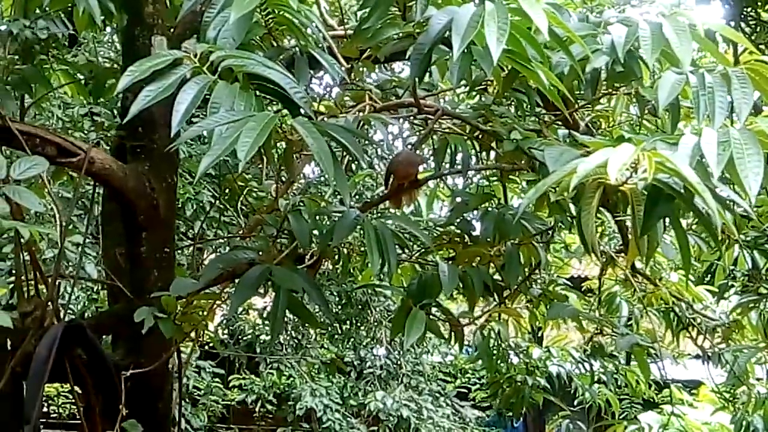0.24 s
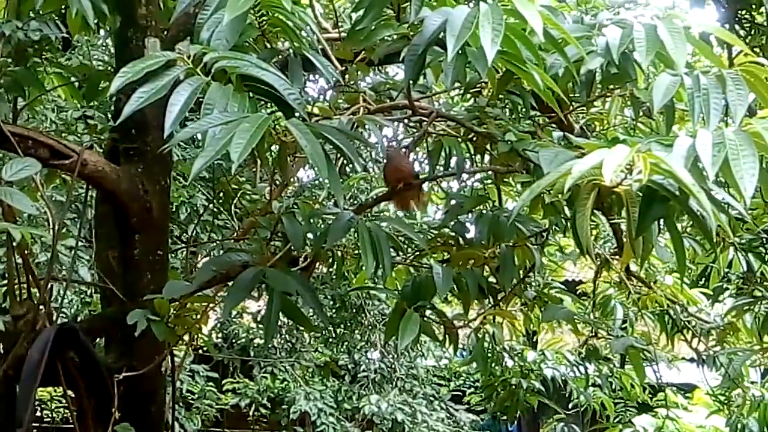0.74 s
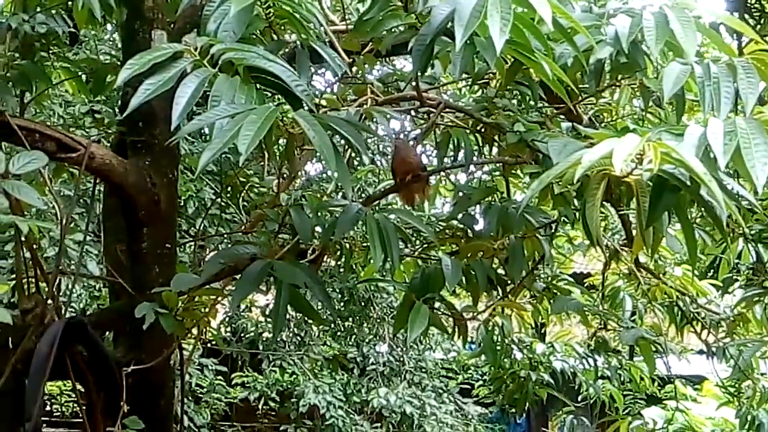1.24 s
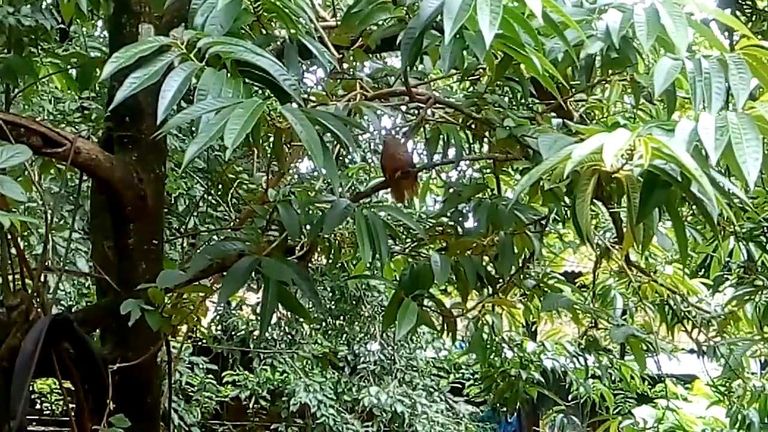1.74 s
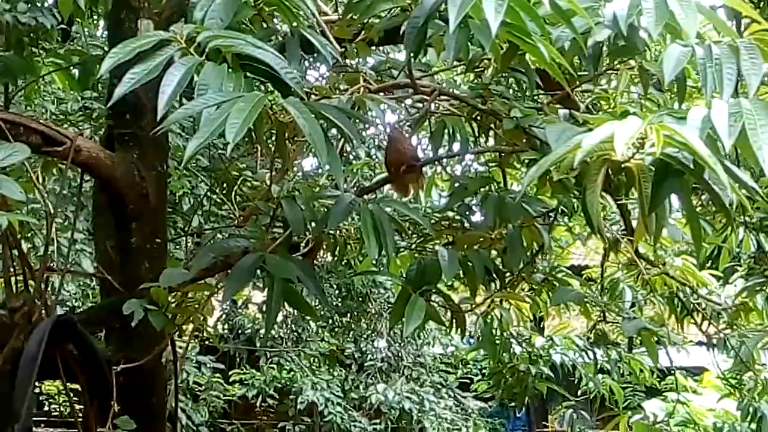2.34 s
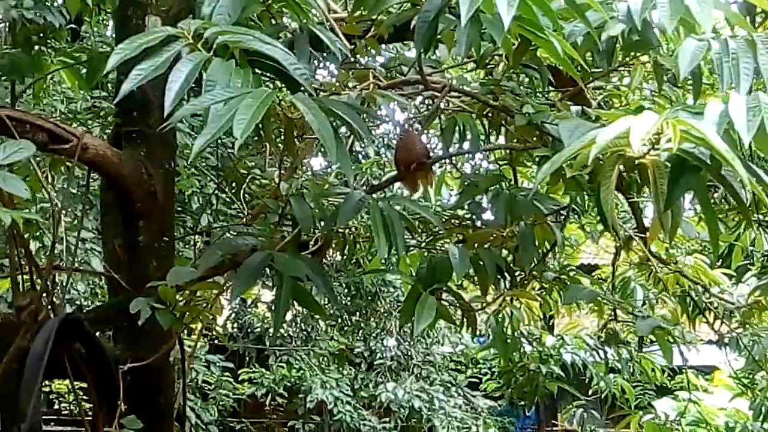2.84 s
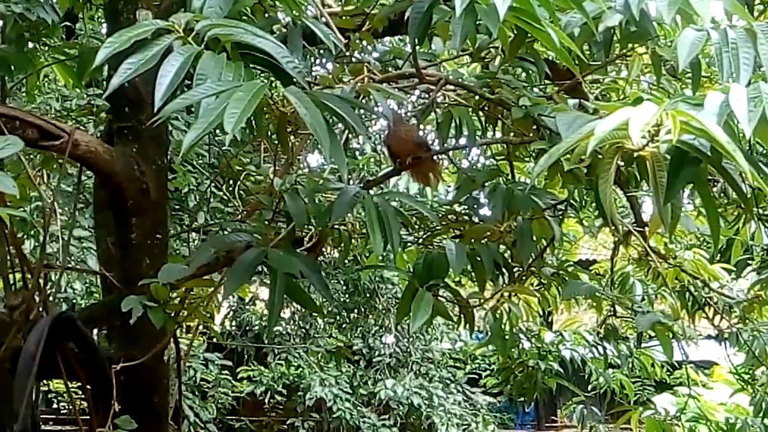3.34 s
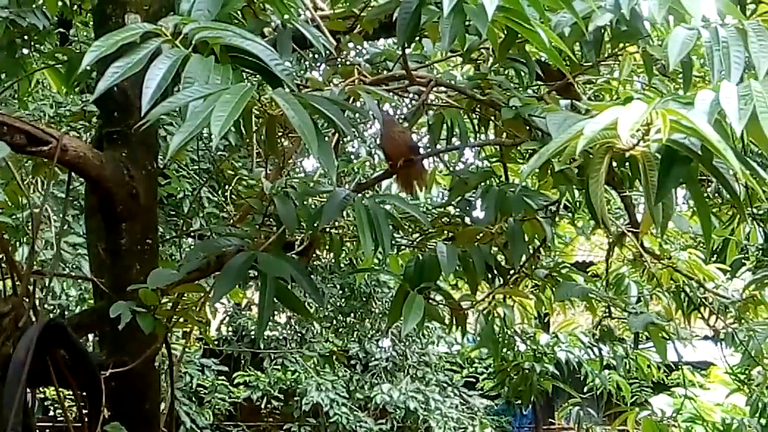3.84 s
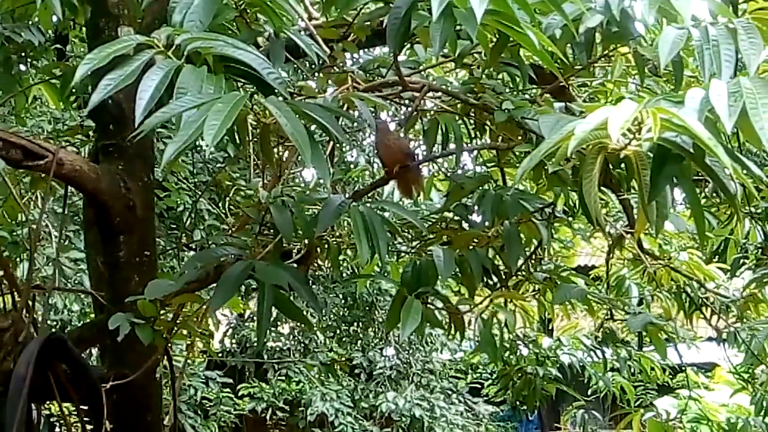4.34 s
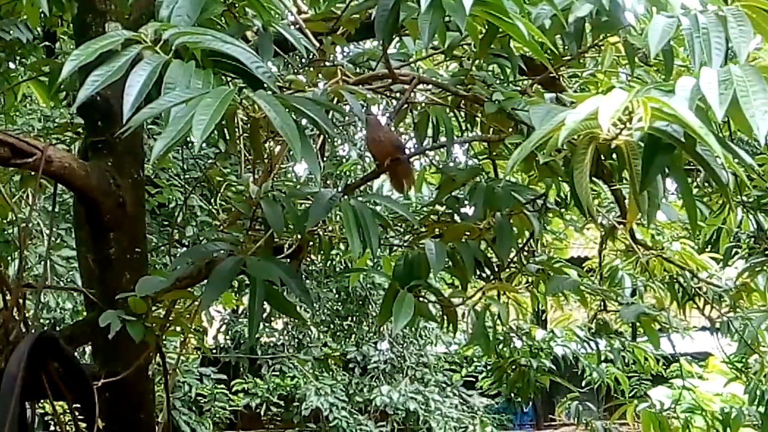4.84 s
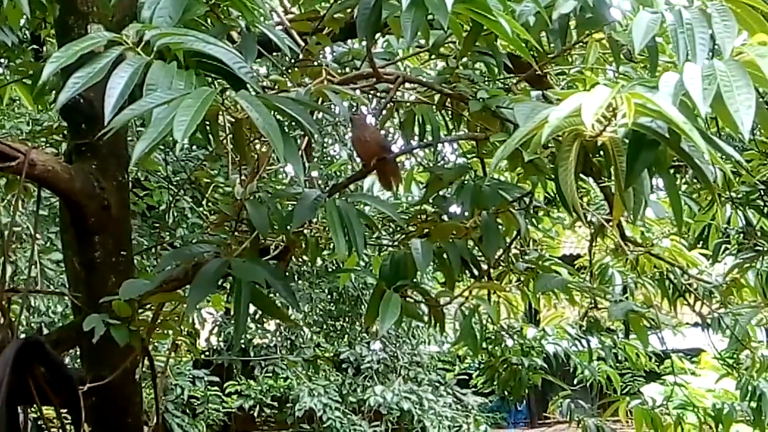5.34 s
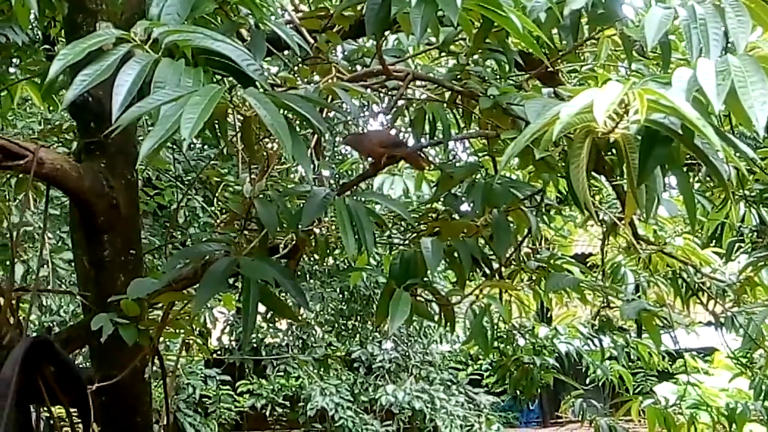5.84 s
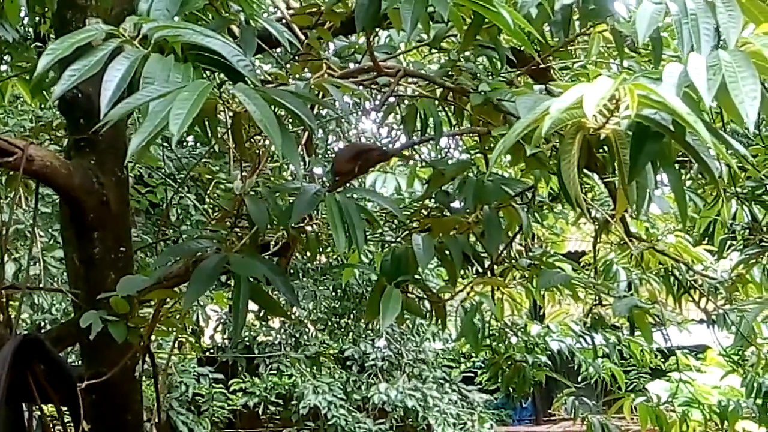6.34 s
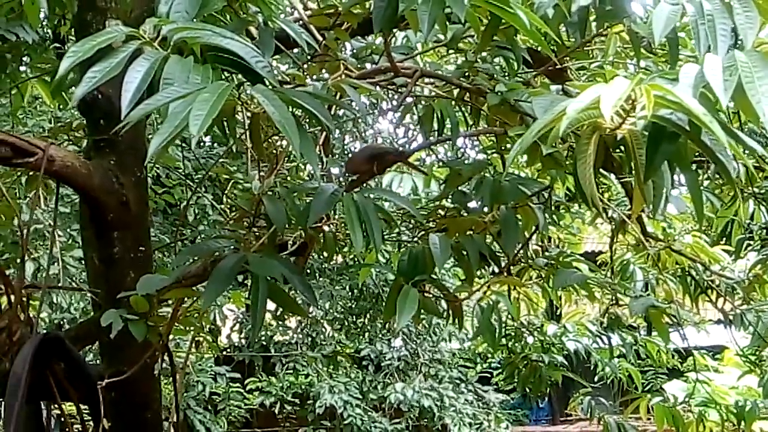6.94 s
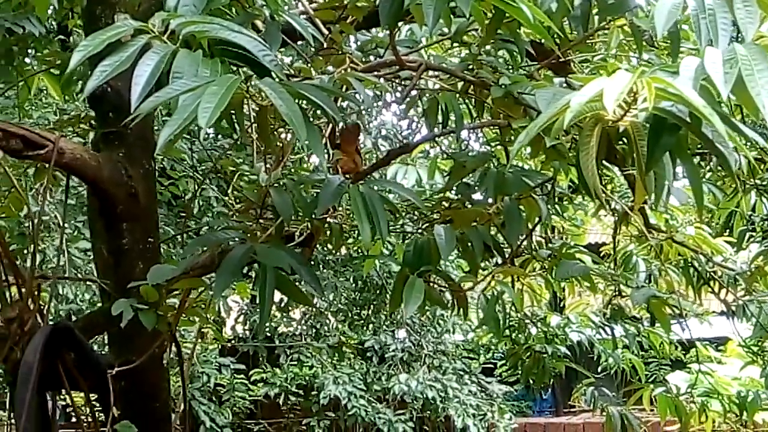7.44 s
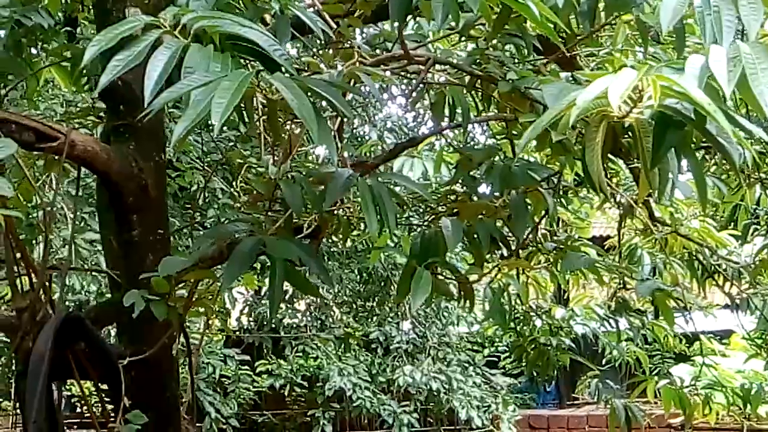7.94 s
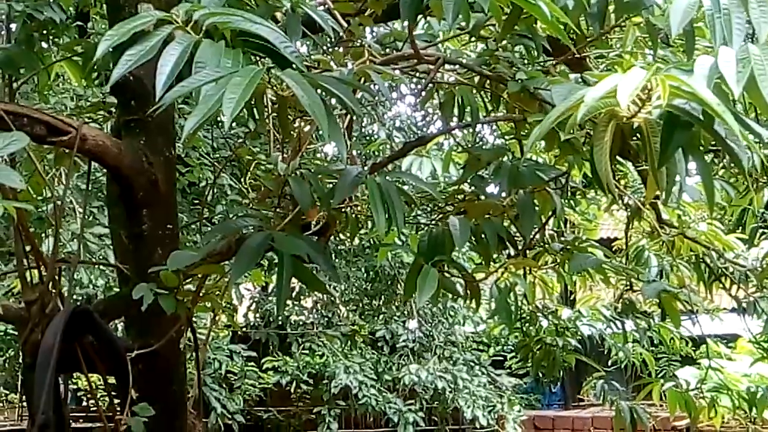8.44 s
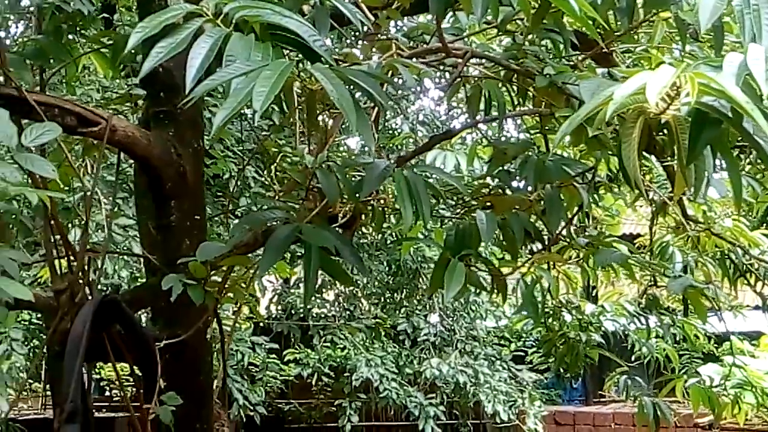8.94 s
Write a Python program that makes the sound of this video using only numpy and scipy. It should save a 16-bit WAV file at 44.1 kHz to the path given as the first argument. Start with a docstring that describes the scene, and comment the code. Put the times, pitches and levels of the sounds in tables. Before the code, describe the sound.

A babbler in a leafy garden tree gives quick, nasal chattering notes, each dropping into a rasp, mixed with short softer chucks. After about four seconds it falls silent; a thin wheezing hiss, faint whistles and distant crowing show through. A cicada begins clicking bursts on the left, and the bird resumes loudly. Stereo outdoor pickup with leafy echoes and steady insect hiss stronger on the left.

```python
"""A babbler chatters in a garden tree: each note is a clear arch of harmonics that drops into a rasp.
A cicada on the left starts up in short bursts of clicks, each setting its body ringing.
A small bird wheezes: a whistle shaken so fast that it hisses. Far birds and horns are unsteady tones.
Insects, leaves and garden air are shaped noise; leaves and walls send most of the calls back as echoes."""
import sys
import numpy as np
from scipy import signal
from scipy.fft import rfft, irfft, next_fast_len
from scipy.io import wavfile
from scipy.ndimage import uniform_filter1d

SR = 44100
rng = np.random.default_rng(int(sys.argv[2]) if len(sys.argv) > 2 else 0)


def generate_wav(sig):
    """Save sig (samples, or channels by samples) to the path in sys.argv[1] as 16-bit PCM at SR."""
    pcm = np.round(np.clip(np.atleast_2d(sig).T, -1, 1) * 32767).astype(np.int16)
    wavfile.write(sys.argv[1], SR, pcm)


N = 404838  # length of the scene in samples
CUTOFF_HZ = 15300  # nothing much is heard above this
# Levels in the tables are those before mixing.


def amp(db):
    """Turn decibels into a gain."""
    return 10 ** (np.asarray(db) / 20)


def rms_one(x):
    """Scale a sound to an average (rms) strength of 1."""
    return x / np.sqrt(np.mean(x ** 2) + 1e-20)


def at_hz(points, hz):
    """Read a curve between its points, on a log-frequency axis."""
    f, value = np.array(points)[:, 0], np.array(points)[:, 1]
    return np.interp(np.log(hz + 1), np.log(f), value)


def coloured(x, points):
    """Make some frequencies stronger or weaker, following a (f/Hz, gain/dB) curve."""
    size = next_fast_len(N)
    gain = amp(at_hz(points, np.fft.rfftfreq(size, 1 / SR)))
    return irfft(rfft(x, size) * gain, size)[..., :N]


def lowpass_or_band(x, hz, kind):
    """Keep the part of a sound below one frequency, or between two."""
    return signal.sosfilt(signal.butter(2, hz, kind, fs=SR, output="sos"), x)


def flutter(rate_hz):
    """Random wobble up to about rate_hz, with a spread of 1."""
    return rms_one(lowpass_or_band(rng.standard_normal(N), rate_hz, "low"))


def turns_of(hz):
    """Add up a changing pitch into the angle of a vibration, in radians."""
    return 2 * np.pi * np.cumsum(hz) / SR


def played(calls, fade_s):
    """Join calls that follow one another into curves in time, plus a gate open while a call lasts."""
    t = np.arange(N) / SR
    s, *columns = np.vstack(calls).T
    edges = np.ravel([(c[0][0] - .002, c[0][0], c[-1][0], c[-1][0] + fade_s) for c in calls])
    gate = np.interp(t, np.maximum.accumulate(edges), np.tile([0, 1, 1, 0], len(calls)))
    return [np.interp(t, s, c) for c in columns] + [gate]


def arch(first, middle, last, share):
    """Draw the parabola through three values at the start, middle and end."""
    return np.polyval(np.polyfit([0, .5, 1], [first, middle, last], 2), share)


def ring(x, hz, t60):
    """Let each click set a sine ringing; a unit click gives height 1, and t60 seconds lose 60 dB."""
    r, w = amp(-60 / (t60 * SR)), 2 * np.pi * hz / SR
    return signal.lfilter([0, np.sin(w)], [1, -2 * r * np.cos(w), r * r], x)


# Babbler notes, one row each: start t/s, arch length t/s, drop length t/s,
# onset f/Hz, mid-arch f/Hz, knee f/Hz, onset level/dB, mid-arch level/dB, rasp level/dB,
# roughness at onset (0-1), roughness at knee (0-1), fundamental level/dB, upper harmonics level/dB.
# The knee is where the arch breaks into the drop; harmonic levels are relative to the second harmonic.
BABBLER_NOTES = [ (0.0, 0.085, .025, 2000, 2053, 2015, -33.5, -40.5, -45, 0.15, 0.69, 6, 1),
                 (.185, 0.0078, 0.036, 1765, 1792, 1746, -45, -39.5, -47, 0.09, 0.06, 0, -12),
                 (.34, 0.0091, 0.042, 1540, 1548, 1560, -42, -48.5, -49, 0, 0.12, 1, -19),
                 (.494, .14, .028, 1882, 2090, 1958, -41.5, -34.5, -39.5, 0.09, 0.73, 1.5, 1),
                 (.737, 0.11, .028, 1915, 2086, 1919, -40, -34, -37, 0.17, 0.87, -1, 1.5),
                 (.951, 0.1, .03, 1900, 2010, 1898, -41.5, -32.5, -37, 0.14, .85, -1, 2),
                 (1.165, .095, .04, 1794, 1962, 1719, -37.5, -32, -34, 0.22, 0.34, -7, 0.5),
                 (1.392, 0.0094, .038, 1440, 1427, 1432, -47, -40, -40.5, 0.37, .45, 0.5, -10),
                 (1.567, 0.017, .03, 1424, 1399, 1370, -49, -42, -47, .1, 0.23, 4.5, -16),
                 (1.675, 0.0094, 0.032, 1618, 1590, 1571, -35, -48, -49.5, 0.42, 0.48, 4, -24),
                 (1.778, 0.0091, 0.056, 1808, 1820, 1800, -42, -40.5, -39, 0.22, 0.27, -3, -13),
                 (1.938, 0.028, 0.068, 1770, 1754, 1712, -44, -40.5, -33.5, 0.1, 0.21, -5, -5.5),
                 (2.142, 0.099, .045, 1774, 1778, 1736, -41.5, -34, -32.5, .7, 0.19, -7, -1),
                 (2.382, .01, 0.042, 1481, 1465, 1452, -45, -33.5, -38.5, 0.48, 0.47, 1, -1.5),
                 (2.543, 0.096, 0.044, 1777, 1677, 1582, -42.5, -32.5, -32, 0.65, 0.12, -10, 0),
                 (2.764, 0.015, .045, 1533, 1533, 1508, -54, -39.5, -33, .5, 0.47, 1, 2),
                 (2.95, 0.0094, 0.028, 1286, 1244, 1216, -44, -42, -43.5, 0.44, 0.48, 7, -4),
                 (3.134, 0.13, 0.052, 1748, 1845, 1605, -36.5, -29, -32, 0.21, 0.08, -6.5, 4),
                 (3.38, 0.096, 0.028, 1690, 1626, 1350, -38.5, -32.5, -30.5, 0.69, 0.17, -2.5, 1.5),
                 (3.588, 0.078, 0.036, 1581, 1466, 1274, -39.5, -33.5, -33, 0.68, 0.28, -3, -1),
                 (3.788, .102, .035, 1641, 1519, 1341, -41, -29.5, -33.5, 0.74, 0.11, -2.5, 2),
                 (4.0, 0.019, 0.041, 1513, 1441, 1382, -45, -35.5, -35.5, 0.53, 0.48, 3, 1),
                 (4.166, 0.016, 0.032, 1464, 1412, 1283, -32, -39.5, -40, 0.39, 0.56, 2.5, -.5),
                 (7.739, 0.16, 0.03, 1931, 2018, 1956, -45.5, -40.5, -48, 0.21, 0.67, 8.5, 5.5),
                 (7.998, 0.079, .035, 2096, 1995, 1902, -48.5, -39, -37, 0.25, 0.21, 3.5, 3),
                 (8.185, 0.1, 0.037, 1985, 2129, 1956, -41, -37, -35.5, .15, 0.12, 9, 6.5),
                 (8.396, 0.1, 0.038, 1967, 2166, 1965, -37.5, -30.5, -34.5, 0.18, 0.18, 0, 1),
                 (8.603, 0.12, 0.038, 1893, 2089, 1915, -35.5, -35, -31.5, 0.19, 0.17, 3, 6),
                 (8.832, 0.075, 0.054, 1768, 1922, 1676, -38.5, -32, -32.5, 0.21, .1, -2, 5),
                 (9.035, .085, 0.035, 1730, 1661, 1469, -43, -32, -29, 0.64, 0.12, -2.5, 3)]
# Colour that throat and beak give the voice: f/Hz, gain/dB
THROAT_COLOUR = [(240, -64), (400, -53), (518, -25.5), (791, -15), (1060, -28), (2220, -10), (3100, -13),
                 (4390, -1), (5030, -10), (6220, -9), (7580, -30), (9370, -27.5), (10600, -57.5),
                 (11800, -37), (15000, -52.5)]


def babbler():
    """Pulses from the voice organ (syrinx); roughness jitters them and lets air rasp through."""
    notes = [babbler_note(*row) for row in BABBLER_NOTES]
    pitch_hz, level_db, rough, low_db, high_db, gate = played(notes, fade_s=0.008)
    rough = np.clip(rough, 0, 1)
    pitch_hz = uniform_filter1d(pitch_hz, size=600)  # muscles bend the pitch smoothly
    waver = (0.00299 + 0.0299 * rough) * flutter(55.65)
    jitter = .14 * rough ** 2 * flutter(404.4)
    turns = turns_of(pitch_hz * (1 + waver + jitter))
    # Staggered phases soften the pulse.
    harmonics = [np.cos(k * (turns + k / 2)) * (k * pitch_hz < CUTOFF_HZ) for k in range(1, 13)]
    pulses = amp(low_db) * harmonics[0] + harmonics[1] + amp(high_db) * sum(harmonics[2:])
    # Strong and weak cycles taking turns add tones halfway between the harmonics.
    halves = sum(np.cos((k - .5) * turns) for k in range(2, 6))
    pulses += 1.89 * np.maximum(rough - .12, 0) * halves
    pulses *= 1 + 0.92 * rough * flutter(320)  # uneven cycles smear each harmonic but keep its glide
    rasp = 1.48 * rough * rng.standard_normal(N) * (1 + 0.28 * np.cos(turns))
    voice = coloured(np.sqrt(1 - 1.08 * rough) * pulses + rasp, THROAT_COLOUR)
    # Even out the strength first, so that the level curve alone sets the loudness.
    evened = voice / np.sqrt(uniform_filter1d(voice ** 2, size=400) + 1e-12)
    return evened * amp(level_db - 1.0 + 1.7 * flutter(167)) * gate


ATTACK_S, ATTACK_DB = 0.0066, -9  # each note opens from this far below its onset level
KNEE_DIP_DB = -0.5  # the voice thins where the arch breaks
HALF_DROP, HALF_ROUGH = .42, 0.4447  # midway through the drop: share of the pitch lost, least roughness
RASP_HZ, RASP_ROUGH, RASP_FADE_DB = 749, .82, -5  # foot of the drop
SETTLES_AT, FRAYS_AT = 0.44, .7  # shares of the arch: roughness has settled, roughness moves to the knee's
CLEAR_ROUGH = 0.0791  # roughness of longer arches between those two points
TAIL_S, TAIL_HZ, TAIL_FADE_DB = .035, 650, -19  # the dying tail
SHORT_S = .05  # arches up to this length keep the mean of onset and knee roughness there


def babbler_note(start, arch_s, drop_s, onset_hz, mid_hz, knee_hz, onset_db, mid_db, rasp_db,
                 hoarse, frayed, low_db, high_db):
    """One note as rows of t/s, f/Hz, level/dB, roughness, fundamental/dB, upper/dB: arch, drop, tail."""
    share = np.linspace(0, 1, num=11)
    knee = start + arch_s
    s = start + arch_s * share
    hz = arch(onset_hz, mid_hz, knee_hz, share)
    level_db = arch(onset_db, mid_db, (mid_db + rasp_db) / 2 + KNEE_DIP_DB, share)
    level_db += ATTACK_DB * np.maximum(1 - (s - start) / ATTACK_S, 0)
    middle_rough = CLEAR_ROUGH if arch_s > SHORT_S else (hoarse + frayed) / 2
    rough = np.interp(share, [0, SETTLES_AT, FRAYS_AT, 1], [hoarse, middle_rough, middle_rough, frayed])
    half_hz = knee_hz - HALF_DROP * (knee_hz - RASP_HZ)
    foot_db = rasp_db + RASP_FADE_DB
    rows = list(zip(s, hz, level_db, rough))
    rows += [(knee + drop_s / 2, half_hz, rasp_db, max(HALF_ROUGH, frayed)),
             (knee + drop_s, RASP_HZ, foot_db, RASP_ROUGH),
             (knee + drop_s + TAIL_S, TAIL_HZ, foot_db + TAIL_FADE_DB, RASP_ROUGH)]
    return [(*row, low_db, high_db) for row in rows]


# Cicada bursts: t/s, click level/dB before the clicks are softened
CICADA_BURSTS = [(6.495, -64.5), (6.576, -68), (6.6742, -48.5), (6.7616, -48), (6.996, -46.5),
                 (7.1444, -45.5), (7.232, -46), (7.4703, -48), (7.6148, -47.5), (7.702, -46.5),
                 (7.9425, -48), (8.1777, -45.5), (8.4127, -47), (8.5606, -49.5), (8.6517, -47),
                 (8.8845, -47), (9.0306, -46.5)]
# Ringing tones of the cicada's body, main one first: f/Hz, level/dB, time to fall by 60 dB t/s
CICADA_BODY = [(2588, -5.5, 0.062), (4660, -14, 0.02), (6060, -3.5, 0.017), (9997, -15.5, 0.0088),
               (12585, -28, 0.0088)]


def cicada():
    """Four ribs buckle in a burst, thirteen cycles of the body's main ring apart, so in step with it."""
    clicks = np.full(N, 1e-18)  # not quite zero
    gap_s = 13 / CICADA_BODY[0][0]
    for s, click_db in CICADA_BURSTS:
        click_times = s + gap_s * np.arange(4)
        clicks[np.round(click_times * SR).astype(int)] = amp(click_db)
    soft = lowpass_or_band(clicks, [2000, 11000], "band")
    return sum(amp(level_db) * ring(soft, hz, t60) for hz, level_db, t60 in CICADA_BODY)


# Wheezing bird, one list for each of three phrases: t/s, level/dB, centre f/Hz
WHEEZE_PHRASES = [
    [(4.66, -59, 6800), (4.744, -53.5, 7300), (4.86, -53.5, 7240), (5.092, -57, 6960), (5.232, -63, 6280),
     (5.37, -80, 6970)],
    [(5.8, -68, 6500), (5.832, -49.5, 6550), (5.958, -62, 6420), (6.006, -54, 7200), (6.22, -55, 7050),
     (6.378, -58.5, 6650), (6.495, -67, 7080)],
    [(6.5, -61, 7000), (6.526, -56.5, 7010), (6.678, -60.5, 7350), (6.708, -53, 7240), (6.832, -63, 7220),
     (6.888, -58, 7000), (7.05, -73, 6630)],
]


def wheeze():
    """A thin whistle shaken so fast that it spreads into a hissing band."""
    level_db, hz, gate = played(WHEEZE_PHRASES, fade_s=0.016)
    shake = flutter(320)
    sag = 170 * np.clip(shake, -2.4, 0) ** 2  # deep swings spill downward
    turns = turns_of(hz + 120 * flutter(12) + 280 * np.tanh(shake) - sag)
    return np.sqrt(2) * np.sin(turns) * amp(level_db + 1.0 * flutter(120)) * gate


def glides(rows, peak_at, rise_db, fall_db):
    """Far calls as rows of t/s, f/Hz, level/dB: the pitch bends, the level rises and falls away."""
    share = np.linspace(0, 1, num=13)
    rise = rise_db * (1 - share / peak_at) ** 2
    fall = fall_db * ((share - peak_at) / (1 - peak_at)) ** 2
    swell_db = np.where(share < peak_at, rise, fall)
    return [np.transpose([s + length_s * share, arch(*hz, share), peak_db + swell_db])
            for s, length_s, *hz, peak_db in rows]


def tone(calls, wobble, order, overtone_db, hoarse_db):
    """An unsteady sine with one overtone at `order` times its pitch; calls may overlap."""
    out = np.zeros(N)
    shake = 1 + wobble * flutter(139)
    grain = amp(hoarse_db * flutter(120))
    for call in calls:
        s, hz, level_db = np.transpose(call)
        at = np.arange(int(s[0] * SR), int(s[-1] * SR))
        turns = turns_of(np.interp(at / SR, s, hz) * shake[at])
        gain = amp(np.interp(at / SR, s, level_db)) * signal.windows.tukey(len(at), .15)
        out[at] += np.sqrt(2) * gain * (np.sin(turns) + amp(overtone_db) * np.sin(order * turns))
    return out * grain


# Far crowing, pitch of its second harmonic:
# start t/s, length t/s, first f/Hz, middle f/Hz, last f/Hz, peak level/dB
CROWING_GLIDES = [(4.63, 0.33, 1063, 1180, 1142, -66), (4.93, 0.34, 1137, 1264, 1243, -65),
                  (7.55, 0.314, 1155, 1269, 1260, -66)]


def crowing():
    """Far crowing, heard by its second and third harmonics, hence the ratio of 1.5."""
    calls = glides(CROWING_GLIDES, peak_at=0.49, rise_db=-6, fall_db=-12.5)
    return tone(calls, wobble=0.028, order=1.5, overtone_db=-6, hoarse_db=-0.5)


# Whistles of other birds, and at 4.24 s two tones lingering after the babbler's last notes: start t/s, length
# t/s, first f/Hz, middle f/Hz, last f/Hz, peak level/dB
WHISTLE_GLIDES = [(1.33, 0.11, 3990, 3150, 2250, -54.5), (1.45, 0.038, 2530, 2820, 3020, -53),
                  (1.475, .035, 1910, 1660, 1490, -60), (1.6, 0.049, 1301, 1240, 1241, -61),
                  (1.685, 0.044, 1214, 1211, 1177, -57), (1.85, 0.048, 1157, 1205, 1230, -66.5),
                  (4.24, 0.19, 1299, 1298, 1283, -71.5), (4.24, 0.17, 1787, 1752, 1723, -69),
                  (4.38, .2, 813, 927, 955, -85.5), (5.09, 0.12, 812, 787, 763, -73.5),
                  (6.785, .065, 3170, 3320, 3500, -62), (6.855, 0.023, 1810, 1737, 1640, -54.5),
                  (6.875, 0.093, 3640, 3410, 2440, -52.5), (6.97, 0.042, 2300, 1910, 1686, -54),
                  (7.08, .1, 1360, 1257, 1096, -71.5), (7.18, 0.14, 1067, 1250, 1257, -66.5),
                  (7.19, 0.039, 2130, 2320, 2300, -58), (7.3, 0.063, 1496, 1565, 1660, -61.5),
                  (7.36, 0.084, 2154, 1730, 1580, -62), (7.43, 0.049, 2470, 2270, 2210, -60)]


def whistles():
    """Nearly pure gliding tones that start fast and fade slowly."""
    calls = glides(WHISTLE_GLIDES, peak_at=0.096, rise_db=-12, fall_db=-9.5)
    return tone(calls, wobble=.032, order=2, overtone_db=-22, hoarse_db=4.0)


# Low far hoots: start t/s, length t/s, first f/Hz, middle f/Hz, last f/Hz, peak level/dB
HOOT_GLIDES = [(.96, .14, 630, 621.6, 653.6, -68), (2.0, 0.19, 648.6, 631, 556, -73.5),
               (2.2, 0.355, 553.3, 605, 600.3, -71)]


def hoots():
    """Low wavering tones, each with a soft octave above it."""
    calls = glides(HOOT_GLIDES, peak_at=0.39, rise_db=-8, fall_db=-13)
    return tone(calls, wobble=0.042, order=2, overtone_db=-15, hoarse_db=4.0)


# Level of far twitter in the hedges: t/s, level/dB
TWITTER_LEVEL = [(4.3, -81), (4.6, -108), (4.86, -83), (5.15, -76), (5.82, -74), (5.91, -79), (6.01, -67),
                 (6.37, -79.5), (6.46, -100)]


def twitter():
    """Many far small birds blurred into a wavering band: one tone with a quickly shaken pitch."""
    level_db, gate = played([TWITTER_LEVEL], fade_s=0.11)
    turns = turns_of(3400 + 130 * flutter(6) + 250 * flutter(199.8))
    return np.sin(turns) * amp(level_db + 2.8 * flutter(39)) * gate


# Far horns: start t/s, length t/s, first f/Hz, middle f/Hz, last f/Hz, peak level/dB
HORN_GLIDES = [(1.1, .4, 329.4, 329, 327, -70), (2.87, .15, 405.3, 403, 426.7, -67),
               (6.62, .2, 331, 317, 302, -71)]


def horns():
    """Low tones that swell late, each with a faint octave above it."""
    calls = glides(HORN_GLIDES, peak_at=0.72, rise_db=-11, fall_db=-11)
    return tone(calls, wobble=.015, order=2, overtone_db=-19, hoarse_db=4.0)


# Soft low thumps: t/s, starting level/dB
THUMP_STARTS = [(2.189, -67), (4.05, -65.5), (8.325, -61)]


def thumps():
    """Short puffs of low noise that start at once and fall by 60 dB in a third of a second."""
    t = np.arange(N) / SR
    puffs = sum(amp(start_db - 60 * np.maximum(t - s, 0) / 0.33) * (t > s) for s, start_db in THUMP_STARTS)
    return puffs * rms_one(lowpass_or_band(rng.standard_normal(N), [140, 380], "band"))


FAR_CICADA_HZ, FAR_CICADA_DB = 2584.4, -78.5  # level before mixing


def far_cicadas():
    """Bursts of distant cicadas merge into one thin throbbing line: noise through two ringing filters."""
    throb = amp(2.0 * flutter(11.5))
    once = ring(throb * rng.standard_normal(N), FAR_CICADA_HZ, 0.027)
    return amp(FAR_CICADA_DB) * rms_one(ring(once, FAR_CICADA_HZ, 0.047))


# Level of stirring leaves and blurred far calls: t/s, level/dB
RUSTLE_LEVEL = [(0.0, -71.5), (0.41, -72), (0.69, -90), (0.89, -71.5), (1.43, -71), (1.63, -92),
                (1.84, -68.5), (2.3, -75), (2.66, -80), (2.89, -60.5), (3.32, -77.5), (3.5, -67),
                (4.6, -87), (5.01, -74.5), (5.75, -88), (6.29, -72), (6.47, -92), (7.29, -78.5),
                (9.18, -86)]
# Their colour: f/Hz, relative level/dB per Hz
RUSTLE_SPECTRUM = [(250, -30.5), (500, -4.5), (700, -2.5), (1300, -2), (2200, -4), (5000, -24.5),
                   (8000, -31)]


def rustle():
    """Patchy dull noise, partly common to both sides."""
    level_db, _ = played([RUSTLE_LEVEL], fade_s=.1)
    white = rng.standard_normal(N) + 1.47 * rng.standard_normal((2, N))
    patches = amp(2.5 * flutter(10))
    return rms_one(coloured(white, RUSTLE_SPECTRUM)) * amp(level_db + 1.5) * patches


# Broad hiss that swells and fades: t/s, level/dB
WASH_LEVEL = [(4.3, -67), (4.66, -89), (4.8, -78), (5.06, -96), (5.19, -72), (5.67, -98), (6.05, -68),
              (6.64, -94), (7.0, -66), (7.08, -87), (7.22, -63.5), (7.6, -84)]


def wash():
    """Smooth hiss between the twitter and the insect band, separate noise on each side."""
    level_db, gate = played([WASH_LEVEL], fade_s=.1)
    hiss = lowpass_or_band(rng.standard_normal((2, N)), [3200, 6300], "band")
    return rms_one(hiss) * amp(level_db + 4.0) * gate


AIR_DB = -65  # strength of both sides together
# Garden air and insect hiss, left list then right list: f/Hz, relative level/dB per Hz
AIR_SPECTRA = [
    [(30, -32), (70, -26.5), (105, -2), (140, -10.5), (460, -15.5), (700, -20), (1800, -22.5), (3300, -18),
     (5000, -19), (6500, -13.5), (7500, 1), (8200, -8.5), (8900, -47.5), (15000, -25.5)],
    [(30, -24), (70, -12), (105, -5), (140, -8.5), (460, -15.5), (700, -18), (1800, -19), (3300, -13),
     (5000, -16), (6500, -13.5), (7500, -12), (8000, -19), (8600, -46.5), (15000, -28.5)],
]
# How alike the two sides are: f/Hz, share of the power common to both (0-1)
AIR_LIKENESS = [(60, 1), (300, 0.35), (1200, 0.067)]


def air():
    """Steady noise, alike on both sides in the bass, with the insect band mostly on the left."""
    size = next_fast_len(N)
    common, *own = rfft(rng.standard_normal((3, size)))
    share = np.clip(at_hz(AIR_LIKENESS, np.fft.rfftfreq(size, 1 / SR)), 0, 1)
    sides = [irfft(np.sqrt(share) * common + np.sqrt(1 - share) * o, size)[:N] for o in own]
    return amp(AIR_DB) * rms_one(np.array([coloured(x, c) for x, c in zip(sides, AIR_SPECTRA)]))


def echoes(x, t60, wet_db, sparse):
    """Stereo scatter off leaves and walls: uneven reflections dying away, different on each side."""
    t = np.arange(int(.6 * SR)) / SR
    unevenness_db = sparse * rng.standard_normal((2, len(t)))
    tail = rng.standard_normal((2, len(t))) * amp(unevenness_db - 60 * t / t60)
    tail *= np.minimum(t / 0.0011, 1)  # build up in about a millisecond
    tail *= amp(wet_db) / np.sqrt(np.sum(tail ** 2, axis=1, keepdims=True))
    return signal.fftconvolve(x[None], tail, axes=1)[:, :N]


# The babbler's treble is weaker on the right: f/Hz, gain/dB
RIGHT_TREBLE = [(6400, 0), (8500, -21.5), (11000, -13.5), (14800, -5)]


def scene():
    """Mix: near voices keep a direct path; the wheeze and the twitter arrive only as echoes."""
    bird = babbler()
    near = np.array([bird, np.roll(bird, shift=2)]) * amp(-3.5)  # two samples later on the right
    near += echoes(bird, t60=0.11, wet_db=-3.0, sparse=4.2)
    near += echoes(bird, t60=0.41, wet_db=-7.5, sparse=9.8)
    near[1] = coloured(near[1], RIGHT_TREBLE)
    # Gains in double brackets are left, then right.
    bugs = cicada() + far_cicadas()
    bugs_left = bugs * amp([[5], [-10.5]]) + echoes(bugs, t60=0.35, wet_db=-11, sparse=3.0)
    wheezing = echoes(wheeze(), t60=0.17, wet_db=4.0, sparse=8.1) * amp([[2.5], [-2.5]])
    calls = crowing() + whistles() + hoots()
    far = calls + echoes(calls + 2.0 * twitter(), t60=0.34, wet_db=1.0, sparse=3.5)
    low = horns() + thumps()
    return near + bugs_left + wheezing + far + low + rustle() + wash() + air()


def record(dry):
    """Cut the top steeply with a low-pass filter."""
    return signal.sosfilt(signal.cheby2(12, 60, CUTOFF_HZ, fs=SR, output="sos"), dry)


dry = scene()
out = record(dry)
generate_wav(out)
```